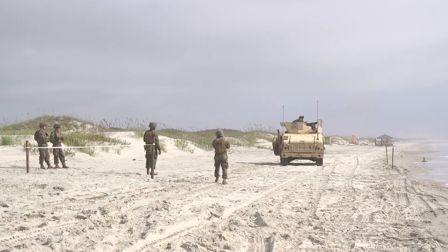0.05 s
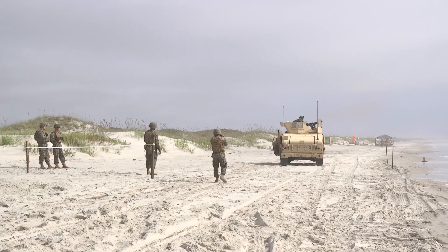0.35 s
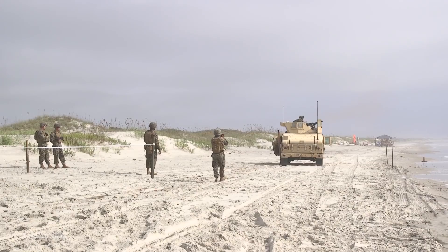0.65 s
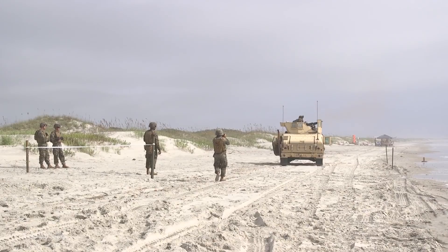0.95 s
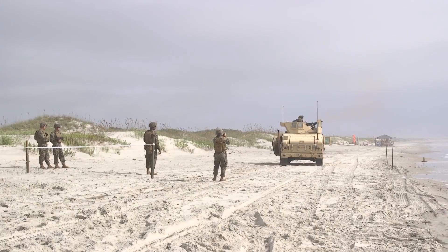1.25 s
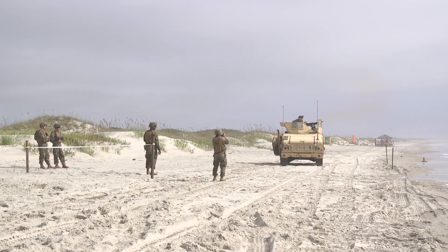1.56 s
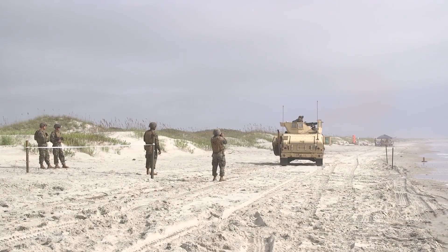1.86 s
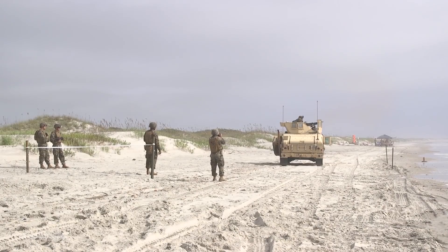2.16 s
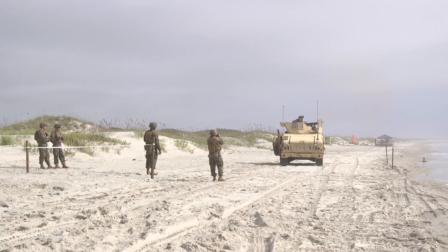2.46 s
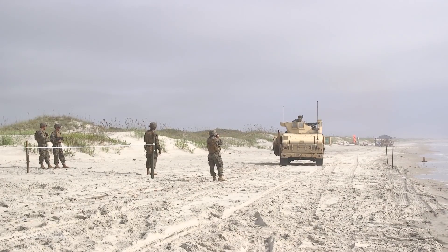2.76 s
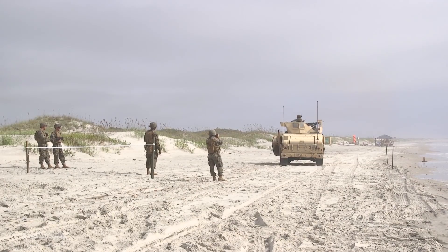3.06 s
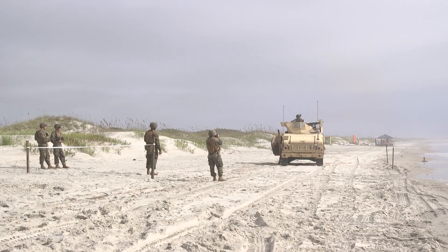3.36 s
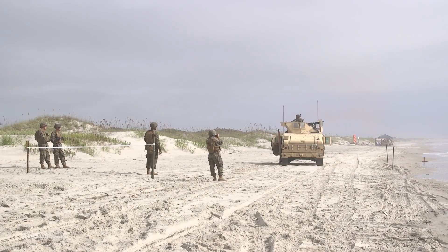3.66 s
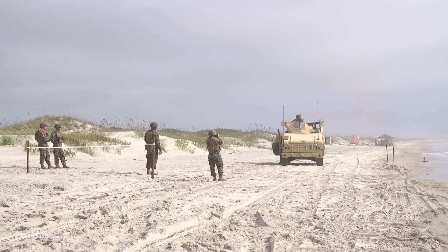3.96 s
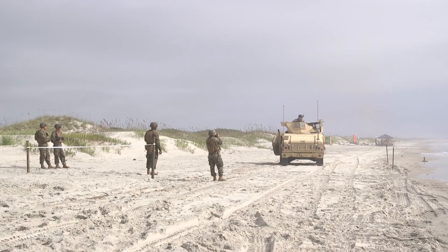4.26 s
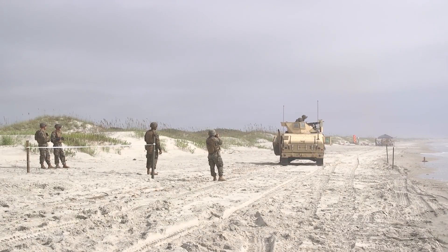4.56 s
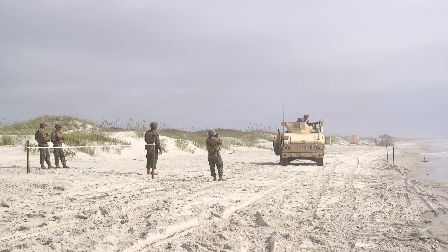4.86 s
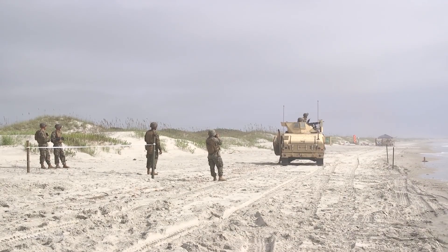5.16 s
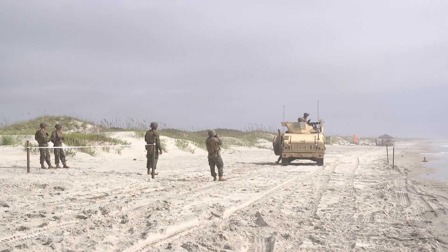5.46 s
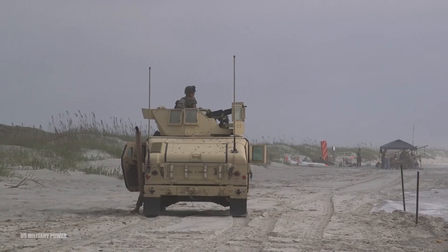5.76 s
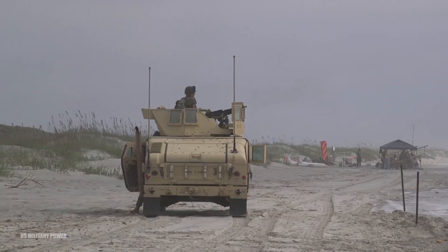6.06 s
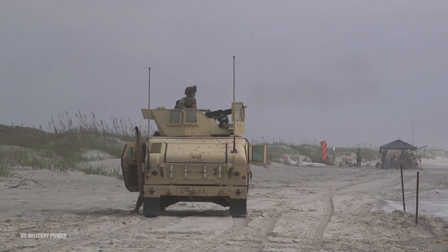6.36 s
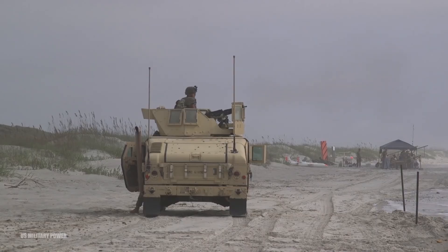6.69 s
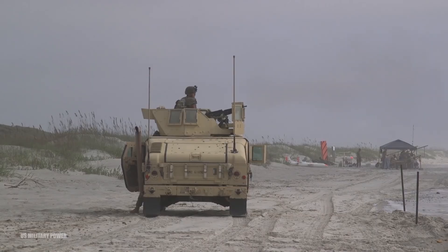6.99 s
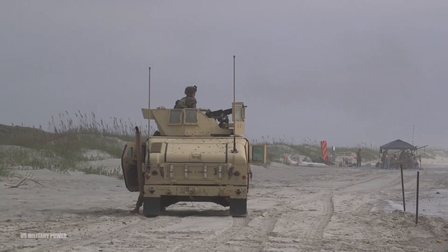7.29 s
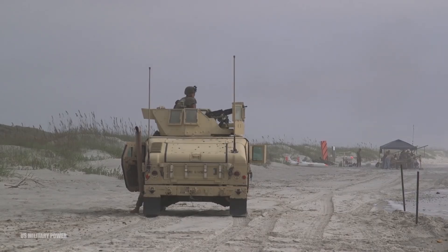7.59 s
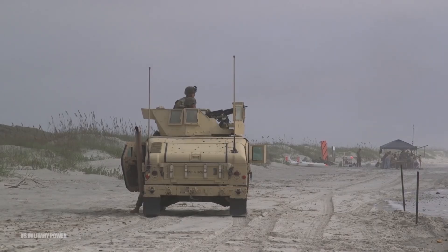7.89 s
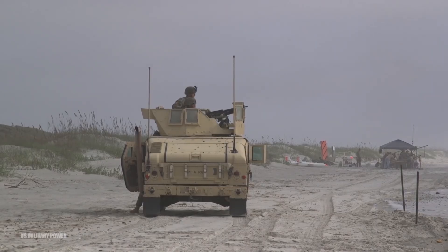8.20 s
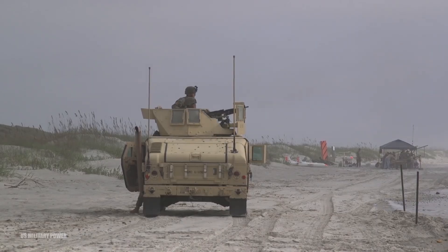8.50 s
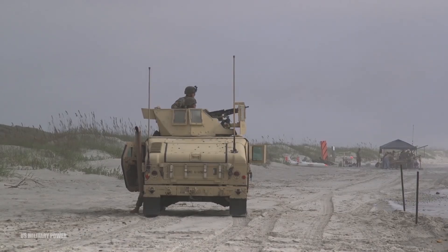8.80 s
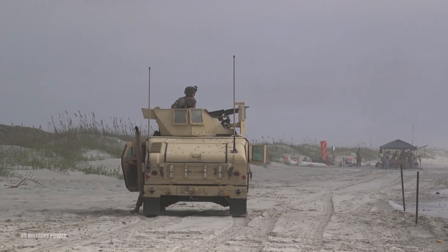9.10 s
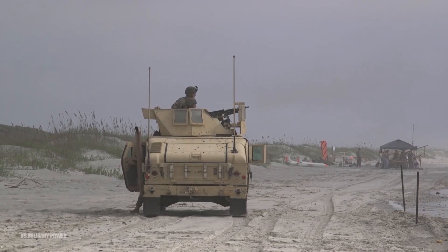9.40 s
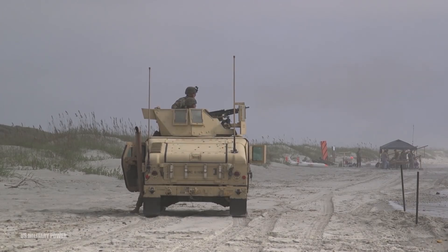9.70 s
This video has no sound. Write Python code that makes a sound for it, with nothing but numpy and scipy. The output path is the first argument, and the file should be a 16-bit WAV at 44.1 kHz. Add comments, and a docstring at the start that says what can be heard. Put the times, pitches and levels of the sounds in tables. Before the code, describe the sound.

A long burst of machine gun fire opens, very close and distorted, followed at once by a short one. Each shot carries a metallic ring and a rolling echo from the dunes. The truck's turret whirs faintly into a third burst, then swings again as empty cases clink softly. Another long burst and two quick ones finish. Quiet, steady surf lies behind everything on the open beach.

```python
"""A beach under dunes, two unlike microphones close to a machine gun on a parked armoured truck.
A long burst opens, about 700 rounds a minute, then a short one; each muzzle blast overloads the pair,
sets the armour ringing and scatters back off the dunes, trailing a low roll. Surf fills the pauses.
The turret buzzes faintly as it swings into the third burst; spent brass clinks during a second swing.
Another long burst follows, and two short ones close."""
import sys
import numpy as np
from scipy import signal
from scipy.fft import irfft
from scipy.io import wavfile
from scipy.ndimage import uniform_filter1d

SR = 44100
rng = np.random.default_rng(int(sys.argv[2]) if len(sys.argv) > 2 else 0)


def dump(signal):
    """Clip the signal to [-1, 1] and save it as 16-bit WAV at the path in sys.argv[1]."""
    limited = np.clip(np.atleast_2d(signal).T, -1, 1)
    pcm = np.round(limited * 32767).astype(np.int16)
    wavfile.write(sys.argv[1], SR, pcm)


N = 429534

# the six bursts: first round t/s, last round t/s, time lost getting up to speed/s,
# lateness of the last round/s, blast level/dB, length of the push/s, scatter level/dB
BURSTS = [(0.0181, 1.8255, .0028, .004, 1, 0.00048, 1), (2.0365, 2.2968, 0.00067, 0.0045, -2, 0.00051, -1),
          (3.499, 4.1044, .0036, -.0015, -4, .00048, -2.5),
          (6.2507, 7.4512, 0.0034, 0.0075, -0.5, 0.00051, 0.5), (8.7647, 8.9395, 0, .002, -2, 0.00054, 0.5),
          (9.3335, 9.6796, 0, .0013, -4.5, 0.00052, -1.5)]


def amp(db):
    return 10 ** (np.asarray(db) / 20)


def unit_rms(x):
    return x / np.sqrt(np.mean(x ** 2) + 1e-20)


def curve(points, hz):
    """A table of values over frequency, joined on a log axis."""
    f, value = np.transpose(points)
    return np.interp(np.log(hz + 1), np.log(f + 1), value)


def add(mix, s, sound):
    """Mixes a sound in at time s."""
    part = mix[..., max(round(s * SR), 0):][..., :sound.shape[-1]]
    part += sound[..., :part.shape[-1]]


def low_cut(x, hz, order):
    return signal.sosfilt(signal.butter(order, hz, "high", fs=SR, output="sos"), x)


def colour(x, points, size=4096):
    """A causal filter of the given colour that keeps the power of white noise."""
    log_gain = np.log(amp(curve(points, abs(np.fft.fftfreq(size, 1 / SR)))))
    taps = np.fft.ifft(np.exp(np.conj(signal.hilbert(log_gain)))).real[:size // 2]
    return signal.oaconvolve(x, taps[None] / np.linalg.norm(taps), axes=1)[:, :N]


def blend(old, new, likeness):
    """Noise that resembles old by the given amount."""
    c = np.clip(likeness, -.99, .99)
    return c * old + np.sqrt(1 - c ** 2) * new


def noise_pair(frames, hz):
    """Random short-time spectra at the two microphones, which are partly out of phase."""
    # likeness of left and right: f/Hz, correlation
    pair = [(60, -.4), (300, -.6), (1200, -.6), (3000, -.05), (12000, 0)]
    left, other = np.moveaxis(rng.standard_normal((frames, len(hz), 4)).view(complex), 2, 0)
    return np.array([left, blend(left, other, curve(pair, hz))])


def waveform(spectra):
    """Short-time spectra to sound, the frames a quarter of their length apart."""
    size = 2 * (spectra.shape[2] - 1)
    frames = irfft(spectra) * signal.get_window("hann", size) * np.sqrt(size / 3)
    quarters = frames.reshape(2, -1, 4, size // 4)
    return sum(np.roll(quarters[:, :, k], k - 2, 1) for k in range(4)).reshape(2, -1)


def round_times(first, last, run_up, run_down, cycle_s=.086, up_rounds=1.5, down_rounds=.8):
    """The bolt cycles evenly, except that it may start slowly and its last round comes off the beat."""
    k = np.arange(round((last - first) / cycle_s) + 1)
    late = run_up * (1 - np.exp(-k / up_rounds)) + run_down * np.exp((k - k[-1]) / down_rounds)
    return first + late + (last - first - late[-1]) * k / k[-1]


def rounds():
    """Every round fired: t/s, strength, length of the push/s."""
    return [(s, amp(db), push) for *timing, db, push, _ in BURSTS for s in round_times(*timing)]


def surf(level_db=-46.5, patchy_db=.8):
    """Behind everything, a steady wash of breakers with faint drifting patches."""
    # spectrum of the breakers: f/Hz, relative level/dB
    spectrum = [(25, -43), (50, -14), (100, -3.5), (160, -0.5), (250, 0.5), (400, -2.5), (630, -5),
                (1000, -8.5), (2000, -17), (4000, -28.5), (8000, -37), (14500, -45)]
    # how the surf leans across the pair: f/Hz, left over right/dB
    balance = [(60, 0), (200, -3.5), (500, -4.5), (1300, -3), (4400, 3), (12000, .5)]
    hz = np.fft.rfftfreq(1024, 1 / SR)
    noise = noise_pair(N // 256 + 2, hz)
    drift = uniform_filter1d(rng.standard_normal(noise.shape[1:]), size=20, axis=0)
    patches = unit_rms(uniform_filter1d(drift, size=10, axis=1))
    lean_db = np.array([.5, -.5])[:, None, None] * curve(balance, hz)
    wash = waveform(noise * amp(curve(spectrum, hz) + lean_db + patchy_db * patches))[:, :N]
    return unit_rms(wash) * amp(level_db)


def dunes(left_db=-20.5, right_db=-28, rise_s=.0071, roll_t60=2.7, roll_right_db=6):
    """Each blast returns as lumpy scatter, echoes and a long roll; wind slowly changes the pattern."""
    # near echoes shift with the aim, one row a burst: delay t/s, level/dB, tilt/(dB per octave)
    aims = [
        [(.024, -4.5, 2.5), (.032, 3, -1.1)],
        [(.026, 2, 3), (.045, -2, -5)],
        [(.023, 4, 3.5), (.032, 5.5, -3), (.072, -3.5, 2)],
        [(.029, -9, 1), (.04, -14, 0), (.058, 1, 0)],
        [(.043, 1, 2.8), (.056, 1, -0.7)],
        [(.038, -5, 3), (.05, -2.5, 0)],
    ]
    # colour of the echoes, near and far: f/Hz, level/dB
    echo_colour = [(100, -8), (400, 1), (1000, -2), (3000, -7), (12000, -14)]
    # decay of the near scatter: f/Hz, t60/s
    scatter_t60 = [(100, 0.48), (500, 0.27), (2000, 0.39), (6000, 0.27), (15000, 0.36)]
    # colour of the roll: f/Hz, level/dB
    roll_colour = [(100, -16), (300, -13), (520, -14), (800, -26.5), (2000, -30.5), (6000, -33.5),
                   (15000, -30)]
    # likeness of one round's return to the next: f/Hz, correlation
    repeat = [(100, 0.84), (500, 0.68), (1500, 0.15), (5000, 0.24)]
    # the right microphone hears less deep bass and hiss: f/Hz, level/dB
    right_shade = [(70, -9.5), (300, -.5), (1500, 1), (3500, -2.5), (6000, -4), (12000, -1.5)]
    # colour of the whole return: f/Hz, relative level/dB
    dune_colour = [(30, -56), (100, -3), (220, 2.5), (350, 4.5), (700, 1.5), (1000, -0.5), (2000, -6),
                   (4000, -10), (8000, -19.5), (15000, -30.5)]
    echo_width_s = .004
    far_delay_s, far_width_s, far_db = .11, .093, -14.5  # one broad echo off the far dunes
    sag_db_per_s, vary_db, lumpy_db = .12, .76, 1.3
    hz, t = np.fft.rfftfreq(256, 1 / SR), np.arange(900)[:, None] * 64 / SR
    octaves = np.log2(np.clip(hz, 300, 5000) / 1000)
    scatter = amp(-60 * t / curve(scatter_t60, hz)) * (1 - np.exp(-(t / rise_s) ** 2))
    roll = amp(curve(roll_colour, hz) - 60 * t / roll_t60) * amp([0, roll_right_db])[:, None, None]
    far = amp(far_db) * np.exp(-((t - far_delay_s) / far_width_s) ** 2)
    shade = amp([0 * hz, curve(right_shade, hz)])[:, None]
    pattern, out = noise_pair(len(t), hz), np.zeros((2, N))
    for (*timing, _, _, scatter_db), aim in zip(BURSTS, aims):
        near = sum(amp(db + tilt * octaves) * np.exp(-((t - delay) / echo_width_s) ** 2)
                   for delay, db, tilt in aim)
        echoes = (far + near) * amp(curve(echo_colour, hz))
        envelope = np.sqrt((amp(scatter_db) * scatter) ** 2 + roll ** 2 + echoes ** 2)
        for s in round_times(*timing):
            round_db = vary_db * rng.standard_normal() - sag_db_per_s * (s - timing[0])
            lumps = unit_rms(uniform_filter1d(rng.standard_normal(t.shape), size=3, axis=0))
            pattern = blend(pattern, noise_pair(len(t), hz), curve(repeat, hz))
            add(out, s, waveform(pattern * envelope * shade * amp(round_db + lumpy_db * lumps)))
    return amp([[left_db], [right_db]]) * colour(out, dune_colour)


def turret(right_db=-5):
    """Gear teeth tick into the gearbox; each swing swells and fades, its speed wavering with the load."""
    # swings of the turret: start t/s, end t/s, level/dB
    swings = [(2.8, 3.75, -59.5), (4.3, 5.852, -57)]
    # speed of the drive, one row a swing: t/s, tooth rate f/Hz
    drive = [
        [(3.11, 105), (3.184, 104.3), (3.31, 105.9)],
        [(4.5, 107), (4.846, 111.5), (5.122, 107.5), (5.298, 106.3), (5.54, 109)],
    ]
    # resonance of the gearbox: f/Hz, relative level/dB
    gearbox = [(300, -34), (650, -19), (850, -2), (1000, 3.5), (1200, 1), (1400, -6.5), (2600, -17),
               (6000, -39)]
    t = np.arange(N) / SR
    tooth_hz = np.interp(t, *np.transpose(np.vstack(drive)))
    ticks = np.diff(np.floor(np.cumsum(tooth_hz) / SR), prepend=0)
    effort = sum(amp(db) * np.sin(np.pi * np.clip((t - start) / (end - start), 0, 1))
                 for start, end, db in swings)
    return amp([[0], [right_db]]) * colour((unit_rms(ticks) * effort)[None], gearbox)


def brass():
    """An empty case rings briefly where it lands on the hull."""
    # landings: t/s, level/dB
    clinks = [(4.357, -67), (4.412, -55.5)]
    # modes of the case: f/Hz, relative level/dB, t60/s
    modes = [(4720, -1, .05), (5010, -1, .15), (5250, -3, .05), (6930, 3, .045), (8050, -1, .055),
             (9600, -6, .05), (11500, -10, .04)]
    t, out = np.arange(SR // 4) / SR, np.zeros((2, N))
    for s, db in clinks:
        for hz, mode_db, t60 in modes:
            tone = np.sin(2 * np.pi * (hz * t + rng.random((2, 1))))
            add(out, s, amp(db + mode_db - 60 * t / t60) * tone)
    return out


def armour(right_db=-8):
    """The hull booms and the turret plates ring after every round, inverted on the right microphone."""
    # modes of the armour plates: f/Hz, relative level/dB, t60/s
    plates = [(147, -15, 0.032), (268.7, -13.5, 0.064), (532.2, -21, 0.21), (663, -12.5, 0.051),
              (1017, -17, 0.054), (1671, -24.5, 0.14), (1938, -21, 0.1), (3820, -34, 0.032)]
    t, out = np.arange(4000) / SR, np.zeros(N)
    ring = sum(amp(db - 60 * t / t60) * np.sin(2 * np.pi * hz * t) for hz, db, t60 in plates)
    for s, strength, _ in rounds():
        add(out, s, strength * ring)
    return np.array([out, -amp(right_db) * out])


def gas(left_db=-2, right_db=-8, fade_s=.0041, linger_db=-24, linger_s=.0069, vary_db=1.5):
    """Hot gas roars out behind each bullet for a few milliseconds, much alike from round to round."""
    # colour of the roar: f/Hz, relative level/dB
    roar_colour = [(100, 18.5), (400, -27.5), (700, 0.5), (1100, -4), (1650, 3.5), (2500, -6.5),
                   (4000, -2.5), (8000, -9), (15000, -17)]
    t, out = np.arange(2500) / SR, np.zeros((2, N))
    envelope = np.exp(-t / fade_s) + amp(linger_db) * np.exp(-t / linger_s)
    roar = rng.standard_normal((2, len(t)))
    for s, strength, _ in rounds():
        roar = blend(roar, rng.standard_normal(roar.shape), likeness=.75)
        add(out, s, strength * amp(vary_db * rng.standard_normal()) * envelope * roar)
    return amp([[left_db], [right_db]]) * colour(low_cut(out, hz=220, order=2), roar_colour)


def shock(t, length):
    """A pressure jump that falls through zero into suction."""
    u = np.maximum(t, 0) / length
    return (t >= 0) * (1 - u) * np.exp(-u)


def blasts(left_db=24, right_db=10, turn_hz=90, port_hz=1550, port_q=5, port_db=2):
    """The muzzle shock and its slaps, close up; each microphone's bass cut rings with its own thump."""
    # slaps off the ground, the gun shield and the hull: delay t/s, size against the blast, length/s
    slaps = [(.0013, .25, .0008), (.002, .1, .00015), (.0029, .12, .00013), (.0053, .11, .00014),
             (.0072, .04, .00018)]
    t, out = np.arange(1000) / SR, np.zeros((2, N))
    for s, strength, push in rounds():
        wave = shock(t, push)
        for (delay, size, length), jitter in zip(slaps, rng.standard_normal((len(slaps), 2, 1))):
            wave = wave + size * shock(t - delay * (1 + .05 * jitter), length)
        add(out, s, strength * wave)
    # the right microphone's phase lags through the bass until fully inverted; its port rings briefly
    pole = np.exp(-2 * np.pi * turn_hz / SR)
    turned = signal.lfilter([-pole, 1], [1, -pole], out[1])
    port_ring = amp(port_db) * signal.lfilter(*signal.iirpeak(port_hz, port_q, fs=SR), turned)
    left = amp(left_db) * low_cut(out[0], hz=86, order=3)
    right = amp(right_db) * low_cut(turned + port_ring, hz=74, order=4)
    return np.array([left, right])


def scene():
    return blasts() + gas() + armour() + dunes() + surf() + turret() + brass()


def record(dry, bias=-.033, ceiling=.36, edge_hz=15100):
    """The left input clips hard and off centre, the right saturates softly; both are band-limited."""
    driven = dry[0] + bias
    left = driven / (1 + (driven / ceiling) ** 6) ** (1 / 6) - bias
    right = ceiling * np.tanh(dry[1] / ceiling)
    coupled = low_cut(np.array([left, right]), hz=14, order=1)  # coupling capacitors
    band_limit = signal.firwin(161, edge_hz, window=("kaiser", 8), fs=SR)
    return signal.oaconvolve(coupled, band_limit[None], "same", axes=1)


dry = scene()
out = record(dry)
dump(out)
```